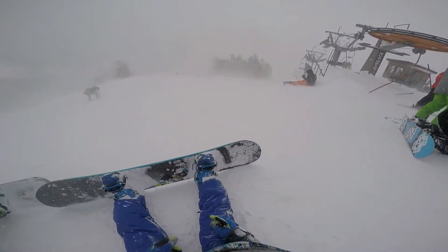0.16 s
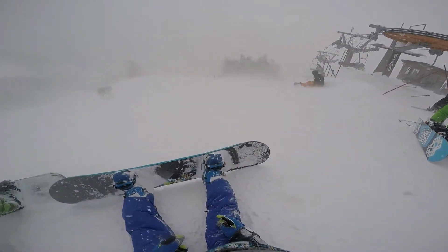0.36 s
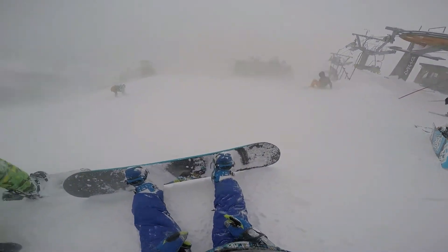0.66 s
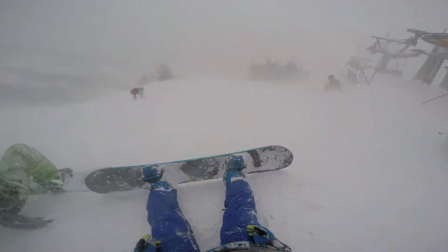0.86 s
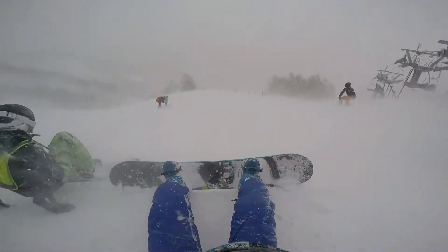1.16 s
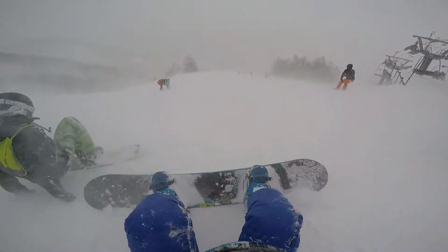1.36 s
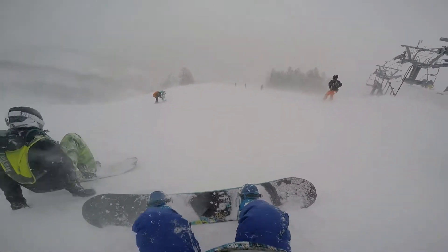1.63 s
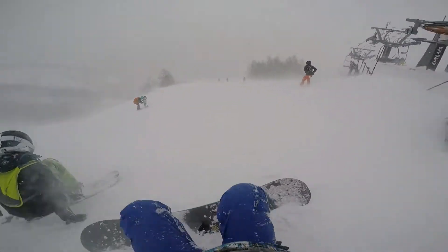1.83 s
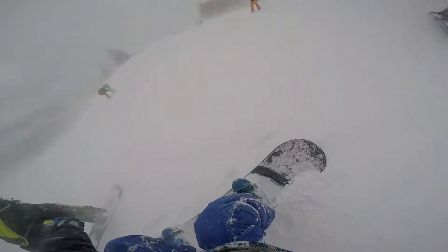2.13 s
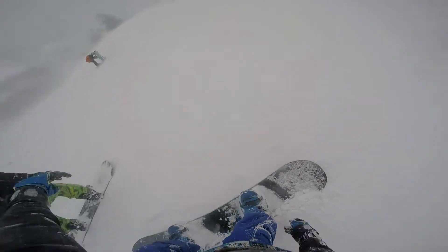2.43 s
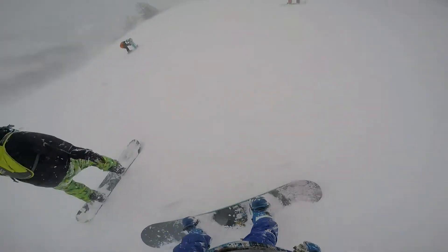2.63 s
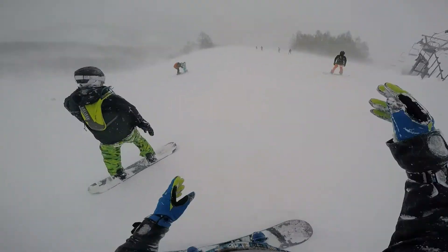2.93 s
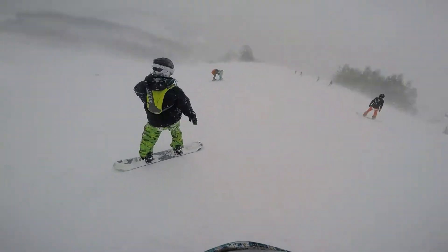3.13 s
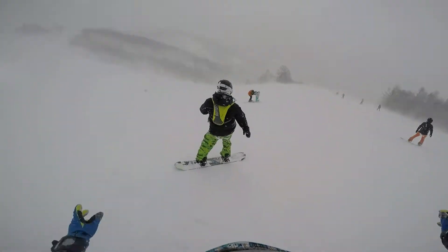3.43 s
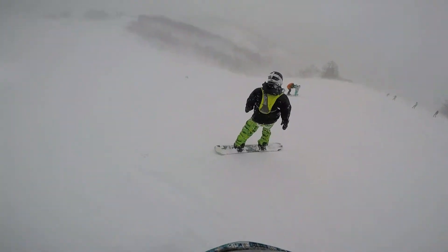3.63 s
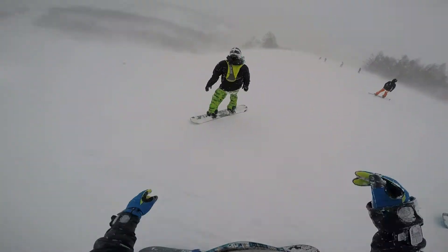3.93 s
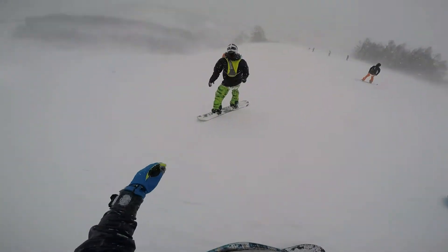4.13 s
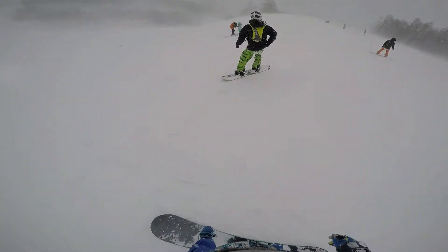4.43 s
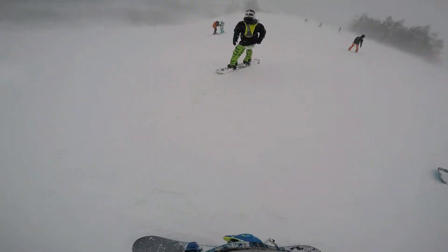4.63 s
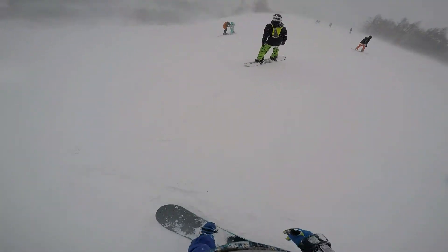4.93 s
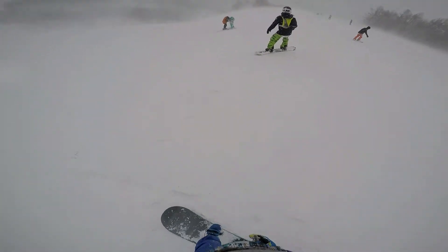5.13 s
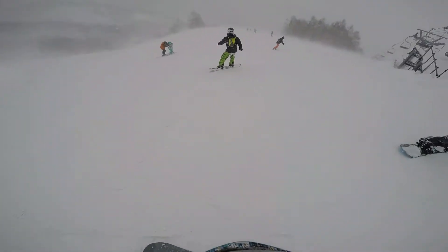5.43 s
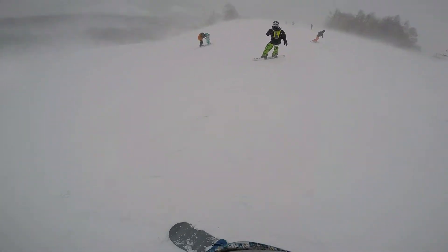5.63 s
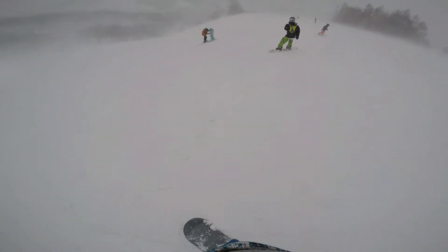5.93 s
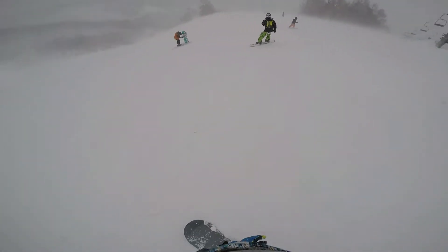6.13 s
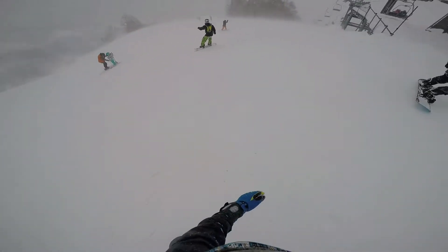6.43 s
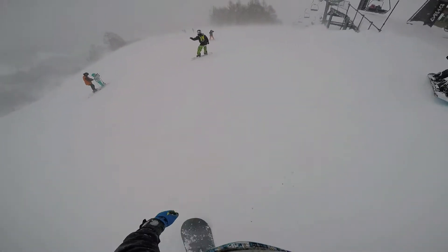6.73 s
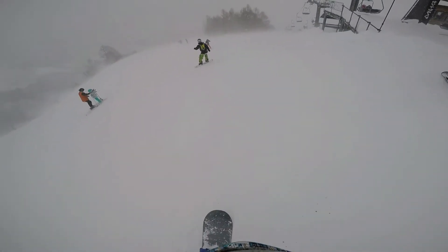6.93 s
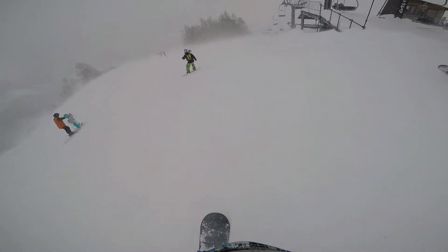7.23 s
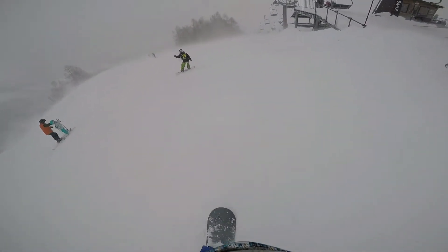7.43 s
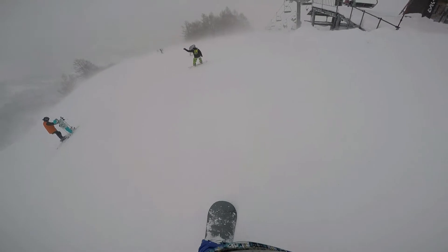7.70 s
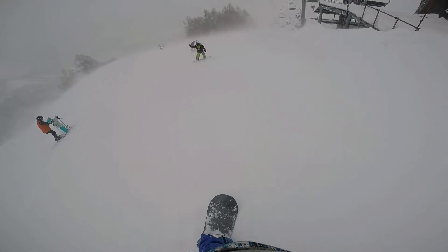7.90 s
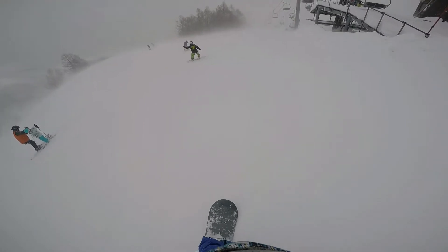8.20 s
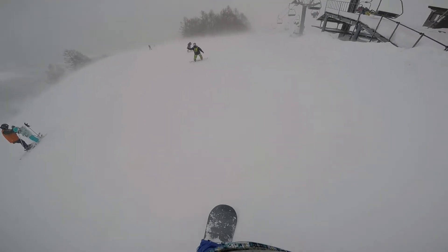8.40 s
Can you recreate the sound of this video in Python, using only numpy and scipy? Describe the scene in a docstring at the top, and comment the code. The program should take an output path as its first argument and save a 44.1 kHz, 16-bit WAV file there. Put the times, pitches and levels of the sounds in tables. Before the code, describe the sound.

Deep, uneven wind buffeting dominates, heard from a body-worn microphone in a plastic case on a stormy open slope. Blown snow crackles on the case during the first two and a half seconds, with a few sharp ice snaps. A snowboard scrapes in short hissing bursts. Hard plastic clacks cluster from three to five seconds, then mostly wind and light scraping remain.

```python
"""Snowboarder on a stormy slope

A snowboarder gets up and slides off down the slope, heard from a body-worn camera in a plastic case.
Wind comes first: eddies buffet the microphone port as noise swings, with bursts of small-eddy noise on top.
Noise pushes ring the case modes as it clacks on its mount; ice grains and dull bumps ring at the port.
Further off, the board scrapes as dense random grains; blown snow patters on the case as sparser ones.
A faint sine is the camera's electronic whine."""
import sys
import numpy as np
from scipy import signal
from scipy.fft import rfft, irfft
from scipy.io import wavfile
from scipy.ndimage import uniform_filter1d

SR = 44100
rng = np.random.default_rng(int(sys.argv[2]) if len(sys.argv) > 2 else 0)


def master(y):
    """Save y as 16-bit WAV."""
    cut = np.clip(np.atleast_2d(y).T, -1, 1)
    pcm = np.round(cut * 32767)  # scale
    wavfile.write(sys.argv[1], SR, pcm.astype(np.int16))


N = 377496
TIME = np.arange(N) / SR  # seconds

# All levels in the tables are nominal: the sources add small trims and random drift.
# Wind at the microphone port.
# Each row: time in seconds, buffeting level in dB, small-eddy level in dB.
WIND_STRENGTH = [(0.0, -16, -31.0), (0.3, -20.5, -28), (0.82, -16.5, -34), (1.22, -13.5, -17),
                 (1.58, -19, -26.5), (2.3, -14, -21.5), (2.56, -23.5, -25.5), (2.64, -16, -21.0),
                 (3.18, -17.5, -23.5), (3.4, -31.5, -30.5), (4.06, -19.0, -29.5), (4.98, -16.5, -18),
                 (5.06, -18.5, -25.0), (5.7, -13.5, -23), (6.04, -18.0, -27.5), (7.4, -15, -24),
                 (7.46, -21.5, -30.5), (7.98, -19, -28), (8.1, -28, -33), (8.54, -22.5, -30)]
# Short gusts on top of the wind.
# Each row: start in seconds, length in seconds, buffeting change in dB, small-eddy change in dB.
WIND_GUSTS = [(0.347, 0.061, 5, 2.5), (0.703, 0.11, 4.5, 7), (0.918, 0.062, 4.5, 8),
              (1.999, 0.07, 5.5, 1.5), (4.302, .11, 5.5, 10.5), (4.7, 0.22, -1, 1.5), (6.42, .12, 1, 4)]
# Lulls, in which wind and scrape drop together.
# Each row: start in seconds, length in seconds, change in dB.
LEVEL_LULLS = [(0.486, 0.075, -2.5), (0.634, 0.056, -5.5), (1.028, .075, -10.5), (1.847, 0.11, -8.5),
               (3.33, 0.083, -1.5), (5.38, 0.034, -8), (8.307, 0.07, -5.5)]
GUST_EDGE_S, LULL_EDGE_S = 0.054, 0.069
# Single large eddies passing the port.
# Each row: time of the middle in seconds, strength in dB, swing frequency in Hz.
LARGE_EDDIES = [(0.399, 0, 45), (0.945, -7.5, 55), (1.378, -2, 44), (2.891, -4, 36), (3.250, -0.5, 29.5),
                (3.285, 0, 25.5)]
# Spectrum of the low buffeting. Each row: frequency in Hz, relative level in dB.
BUFFET_SPECTRUM = [(10, -11), (20, 0.5), (30, -0.5), (55, 0), (80, -4.5), (120, -13), (200, -27),
                   (400, -71)]
# Spectrum of the small eddies. Each row: frequency in Hz, relative level in dB.
SMALL_EDDY_SPECTRUM = [(60, -6.5), (120, 2.5), (180, 1), (280, -5.5), (400, -15.5), (550, -22), (750, -32),
                       (1300, -30), (3000, -39.5), (8000, -47), (11000, -91)]

# Clacks of the case on its mount.
# Each row: time in seconds, peak level in dB, time constant of the slip in seconds.
MOUNT_CLACKS = [(1.052, -23, 0.0022), (1.153, -14, 0.0032), (1.3933, -10, 0.0023), (2.0943, -16, 0.0017),
                (2.9294, -11, 0.0054), (3.014, -16.5, 0.0028), (3.055, -19.5, 0.0018),
                (3.1098, -12.5, 0.0011), (3.176, -13.5, 0.007), (3.264, -10.5, 0.0033),
                (3.319, -17.5, 0.0018), (3.332, -22, 0.0035), (3.4566, -13.5, .005), (3.567, -26.5, .002),
                (3.9545, -22, .002), (4.0024, -14.5, 0.0036), (4.0134, -15.5, 0.0018), (4.326, -7, 0.0036),
                (4.4168, -19, .002), (4.51, -6.5, 0.0053), (4.7316, -18.5, 0.0025), (4.8618, -20, .002),
                (4.9574, -16, .002), (4.9856, -19.5, 0.0028), (5.111, -10.5, 0.0039), (5.4374, -19, 0.0038),
                (7.453, -21, .003), (7.5138, -22, .002), (7.9169, -17, 0.0035)]
# Resonant modes of the plastic case. Each row: frequency in Hz, bandwidth in Hz, relative level in dB.
CASE_MODES = [(1550, 370, -7.5), (2034, 193, 0.5), (2710, 160, 0.5), (3280, 350, -7.5), (4110, 160, -9),
              (4670, 380, -18.5), (5940, 390, -13), (8470, 690, -28)]
CASE_SCATTER = 0.03  # relative spread of the mode frequencies from clack to clack

# Ice grains striking right at the port. Each row: time in seconds, peak level in dB.
ICE_STRIKES = [(0.5856, -17), (1.177, -10), (1.2391, -11.5), (1.2522, -7.5), (1.4868, 5), (1.751, -19.5),
               (2.258, -1), (2.5252, -1.5), (2.788, -17), (2.8612, -18), (3.2095, -13), (3.4183, -26),
               (7.023, -17), (7.8583, -23)]
# Resonances of the port's air cavity. Each row: frequency in Hz, bandwidth in Hz, relative level in dB.
PORT_MODES = [(1460, 130, -58), (2280, 93, 6), (3750, 464, 12), (8700, 2100, -3)]
# Dull bumps through the mount. Each row: time in seconds, peak level in dB, ring frequency in Hz.
MOUNT_BUMPS = [(1.056, -17.5, 794), (3.266, -12.5, 563), (4.511, -21.5, 590)]

# Pressure of the board on the snow. Each row: time in seconds, scrape level in dB.
BOARD_SCRAPE = [(0.0, -46), (0.48, -46), (1.02, -44.5), (1.2, -31.5), (1.82, -39.0), (2.0, -30),
                (2.16, -43.5), (2.26, -30), (2.74, -31.5), (3.66, -48), (3.74, -44), (5.36, -39.0),
                (5.72, -31.5), (6.04, -43.5), (6.46, -33.5), (7.16, -33), (7.26, -41), (8.54, -45)]
# Short swells of the scrape hiss. Each row: start in seconds, length in seconds, rise of the scrape in dB.
SCRAPE_SWELLS = [(.12, 0.09, 7), (0.74, 0.066, 6.5), (1.142, 0.077, 3.5), (7.16, 0.091, 2),
                 (7.798, 0.072, 6.5)]
SCRAPE_SWELL_EDGE_S = 0.019
# Spectrum of the scrape. Each row: frequency in Hz, relative level in dB.
SCRAPE_SPECTRUM = [(500, -15.5), (900, -15.5), (1500, -10), (2000, -2), (2350, 5), (2750, 4), (3100, -3),
                   (3800, -5.5), (4600, -16.5), (5700, -11), (6800, -25), (8200, -33), (10000, -44),
                   (15000, -45)]

# Thin drifting snow on the case. Each row: time in seconds, level in dB.
SNOW_DRIFT = [(0.0, -52), (2.52, -52.5), (2.62, -50), (2.84, -46), (3.5, -60), (5.84, -53), (6.02, -58),
              (6.74, -58), (8.54, -63)]
# Flurries thrown against the case. Each row: start in seconds, length in seconds, level in dB.
SNOW_FLURRIES = [(0, 0.027, -41), (0.101, 0.18, -44), (0.305, 0.068, -50.5), (0.738, 0.15, -40.5),
                 (0.928, 0.065, -32.5), (1.093, 0.18, -34.5), (1.373, 0.026, -34.5), (1.425, 0.11, -38),
                 (2.057, .14, -36.5), (2.212, 0.066, -35), (2.3, 0.18, -45)]
FLURRY_ATTACK_S, FLURRY_RELEASE_S = 0.005, 0.013
# Spectrum of the fine snow. Each row: frequency in Hz, relative level in dB.
FINE_SNOW_SPECTRUM = [(600, -12), (1400, -5.5), (2600, 6.5), (3200, -1.5), (3900, 4.5), (4700, -4.5),
                      (6000, -3.5), (7000, -12), (8800, -9.5), (11000, -12.5), (15000, -16)]
# Spectrum of the coarse snow. Each row: frequency in Hz, relative level in dB.
COARSE_SNOW_SPECTRUM = [(1500, -30), (2800, -16), (3900, -3), (5500, -0.5), (8500, 8), (15000, -8.0)]

WHINE_HZ, WHINE_DB = 12617, -73  # rms level
TOP_HZ = 15400  # upper limit of the camera's sound


def wind():
    """Large eddies rumble at the port; small ones break off in bursts on their pressure swings."""
    buffet_db, small_db = curves(WIND_STRENGTH)
    drop_db = lull_db()
    buffet_db, small_db = buffet_db + drop_db, small_db + drop_db
    for start, length, buffet_change_db, small_change_db in WIND_GUSTS:
        gust = swell(start, length, GUST_EDGE_S)
        buffet_db = buffet_db + buffet_change_db * gust
        small_db = small_db + small_change_db * gust
    large = turbulence(BUFFET_SPECTRUM, span_s=0.123, evenness=1.0)
    small = turbulence(SMALL_EDDY_SPECTRUM, span_s=0.13, evenness=0.79)
    burst_db = 1.66 * large + 1.25 * walk(45)
    small = unit(small * undb(burst_db))
    return large * undb(buffet_db + 0.64) + small * undb(small_db - 1.0) + passing_eddies()


def passing_eddies():
    """Each large eddy raises the pressure at the port, then sucks as it passes."""
    out = np.zeros(N)
    t = TIME[:SR // 5] - 0.1  # zero at the middle of the eddy
    for middle, db, hz in LARGE_EDDIES:
        envelope = np.exp(-(2.94 * hz * t) ** 2)
        pressure = -np.sin(2 * np.pi * hz * t) * envelope
        add(out, middle + t[0], undb(db + 1) * pressure)
    return out


def turbulence(points, span_s, evenness):
    """Coloured pressure swings whose strength stays fairly even over span_s."""
    x = colour(rng.standard_normal(N), points)
    power = uniform_filter1d(x ** 2, int(span_s * SR)) + 1e-9
    return unit(x / power ** (np.clip(evenness, 0, 1) / 2))


def case_clacks():
    """The mount snaps free and slips in a brief stutter of catches that rings the plastic case."""
    out, t = np.zeros(N), TIME[:2048]
    for s, db, slip_s in MOUNT_CLACKS:
        envelope = np.exp(-(t / slip_s) ** 2) + undb(-11) * np.exp(-t / 0.0056)
        slip = rng.standard_normal(len(t)) * envelope
        slip[0] += 4  # a hard first catch
        # the first catch also gives a broadband crack
        crack_noise = signal.lfilter([1], [1, -0.75], rng.standard_normal(len(t)))
        crack = crack_noise * np.exp(-t / 0.0012)
        clack = ring(slip, CASE_MODES, CASE_SCATTER) + undb(-22) * crack
        add(out, s + 0.0005, undb(db + 1.0) * clack)
    return signal.sosfilt(signal.butter(2, 1100, "high", fs=SR, output="sos"), out)


def ice_strikes():
    """Ice grains right at the microphone snap the port's air cavity with very short pushes."""
    out, t = np.zeros(N), TIME[:1024]
    push = np.exp(-t / 0.00003)
    for s, db in ICE_STRIKES:
        add(out, s + 0.00064, undb(db + 1.0) * ring(push, PORT_MODES, detune=0.024))
    return out


def mount_bumps():
    """Soft bumps thud through the mount, each a longer push on one broad, low mode."""
    out, t = np.zeros(N), TIME[:1024]
    push = np.exp(-t / 0.00071)
    for s, db, hz in MOUNT_BUMPS:
        add(out, s, undb(db) * ring(push, [(hz, 170, 0)], detune=0))
    return out


def board():
    """The edge shears countless snow crystals, chattering a little; the case colours the hiss."""
    scrape_db, = curves(BOARD_SCRAPE)
    scrape_db = scrape_db + lull_db()
    for start, length, rise_db in SCRAPE_SWELLS:
        scrape_db = scrape_db + rise_db * swell(start, length, SCRAPE_SWELL_EDGE_S)
    crunch = colour(grains(rate=14000, spread_db=5.5), SCRAPE_SPECTRUM)
    chatter_db = 1.64 * walk(30) + 1.78 * walk(130)
    return crunch * undb(scrape_db - 1.15 + chatter_db)


def blown_snow():
    """Flurries of fine snow hiss on the case, with coarser grains ticking among them."""
    spray_db = snowfall_db()
    # a thin flurry has fewer grains, so it crackles where a thick one hisses
    flux = np.clip(undb(spray_db + 40), 0.25, 1)
    patter = grains(rate=7000 * flux, spread_db=9.0) / np.sqrt(flux)
    fine = colour(patter, FINE_SNOW_SPECTRUM) * undb(spray_db - 0.5 + 4.8 * walk(70))
    ticks = colour(grains(rate=85, spread_db=5.5), COARSE_SNOW_SPECTRUM)
    coarse = ticks * undb(0.43 * spray_db - 37.5)  # follows the flurries less strongly
    return fine + coarse


def snowfall_db():
    """Snow reaching the case: a thin drift, plus flurries that arrive fast, hold and die away."""
    drift_db, = curves(SNOW_DRIFT)
    power = undb(drift_db + 1.5) ** 2
    for start, length, db in SNOW_FLURRIES:
        attack = np.clip((TIME - start) / FLURRY_ATTACK_S, 0, 1)
        release = np.exp(-np.maximum(TIME - start - length, 0) / FLURRY_RELEASE_S)
        power = power + (undb(db) * attack * release) ** 2
    return 10 * np.log10(power)


def camera_whine():
    """The camera's faint electronic whine, a steady sine."""
    return undb(WHINE_DB) * unit(np.sin(2 * np.pi * WHINE_HZ * TIME))


def lull_db():
    """Level change in dB over time from the lulls."""
    return sum(db * swell(start, length, LULL_EDGE_S) for start, length, db in LEVEL_LULLS)


def swell(start, length, edge_s):
    """A linear rise from 0 towards 1 centred on the start, a hold, and a like fall."""
    inside_s = np.minimum(TIME - start, start + length - TIME)
    return np.clip(0.5 + inside_s / edge_s, 0, 1)


def ring(push, modes, detune):
    """Damped modes (Hz, width in Hz, dB) driven by a short push; peak 1."""
    t = TIME[:len(push)]
    body = 0
    for k, (hz, width, db) in enumerate(modes):
        mode_hz = hz * (1 + detune * rng.standard_normal())
        decay = np.exp(-np.pi * width * t)
        sign = (-1) ** k  # neighbouring modes move in opposite phase
        body = body + sign * undb(db) * width * decay * np.sin(2 * np.pi * mode_hz * t)
    y = signal.fftconvolve(push, body)[:len(push)]
    return y / np.abs(y).max()


def grains(rate, spread_db):
    """Random impacts, rate a second on average: many small ones and a few large."""
    size = undb(spread_db * np.minimum(rng.exponential(size=N), 3.5))
    struck = rng.random(N) < rate / SR
    return struck * size * rng.choice([-1, 1], N)


def walk(rate):
    """Smooth random drift with an rms of 1, from rate new values a second."""
    k = max(int(SR / rate), 2)
    steps = np.repeat(rng.standard_normal(N // k + 1), k)[:N]
    return unit(uniform_filter1d(steps, k))


def colour(x, points):
    """Filter by a (Hz, dB) spectrum, causally so that clicks stay sharp; rms 1."""
    hz, db = np.transpose(points)
    bin_hz = np.fft.rfftfreq(N, 1 / SR)
    log_gain = np.log(undb(np.interp(np.log(bin_hz + 1), np.log(hz), db)))
    # folding the cepstrum forward in time gives the minimum phase
    cepstrum = irfft(log_gain, N)
    cepstrum[1:N // 2] *= 2
    cepstrum[N // 2 + 1:] = 0
    return unit(irfft(rfft(x) * np.exp(rfft(cepstrum)), N))


def curves(table):
    """The columns of a table, joined by straight lines in time."""
    s, *columns = np.transpose(table)
    return [np.interp(TIME, s, c) for c in columns]


def add(out, s, sound):
    """Mix a short sound in at time s."""
    i = max(int(s * SR), 0)
    out[i:i + len(sound)] += sound[:N - i]


def undb(db):
    """Decibels to gain."""
    return 10 ** (np.asarray(db) / 20)


def unit(x):
    """Scale to rms 1."""
    return x / np.sqrt(np.mean(x ** 2))


def scene():
    """All sources at the one microphone, from the wind at its port to the whine beneath."""
    at_port = wind() + case_clacks() + ice_strikes() + mount_bumps()
    around = board() + blown_snow()
    return (at_port + around + camera_whine())[None]


def record(dry):
    """The camera clips at full scale and cuts the top."""
    clipped = np.clip(dry, -1, 1)
    return signal.sosfilt(signal.ellip(10, 0.2, 80, TOP_HZ, fs=SR, output="sos"), clipped)


dry = scene()
out = record(dry)
master(out)
```